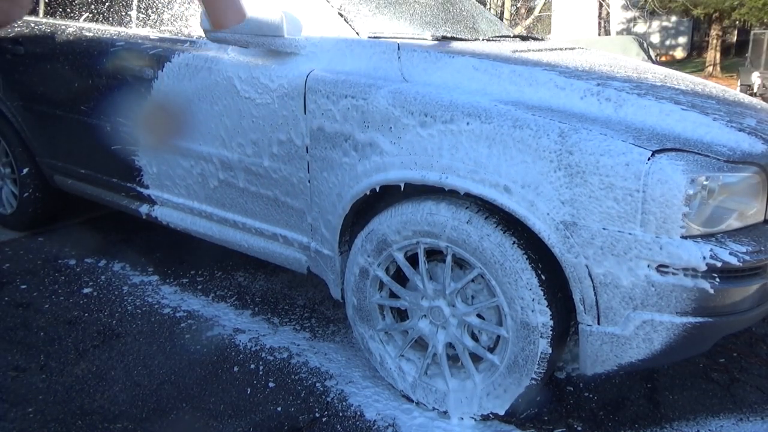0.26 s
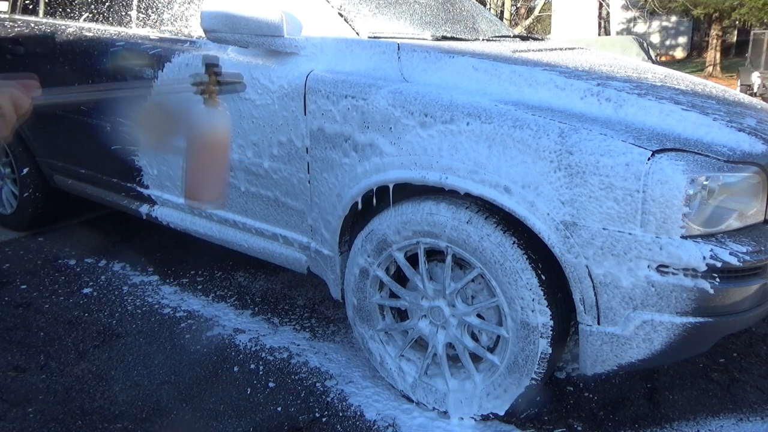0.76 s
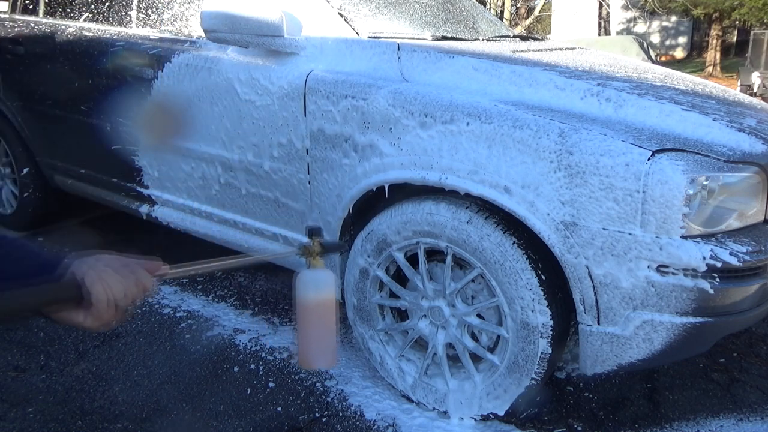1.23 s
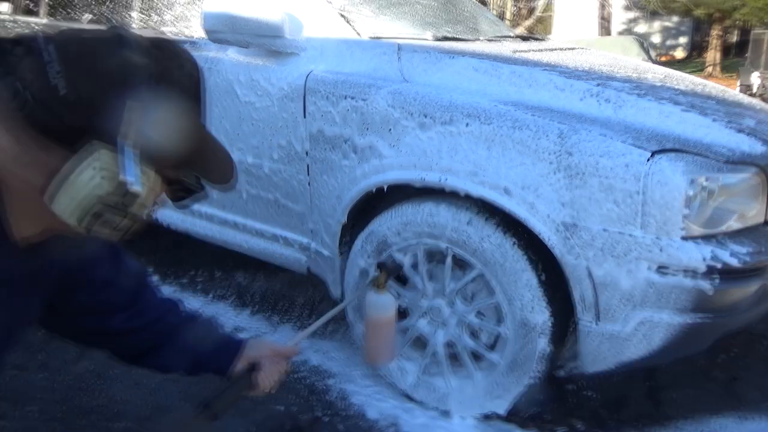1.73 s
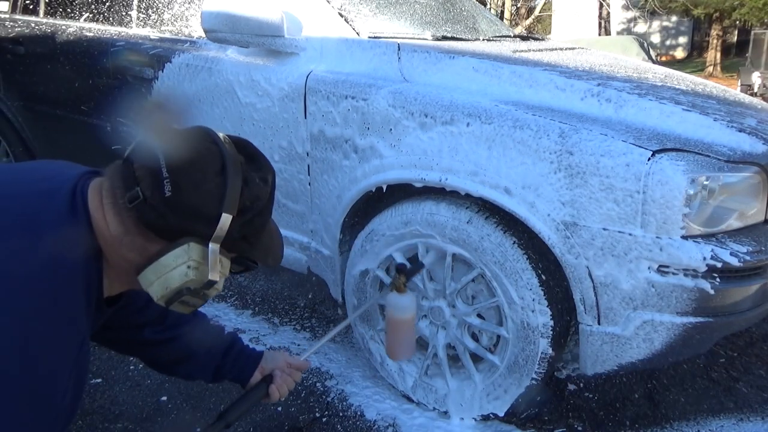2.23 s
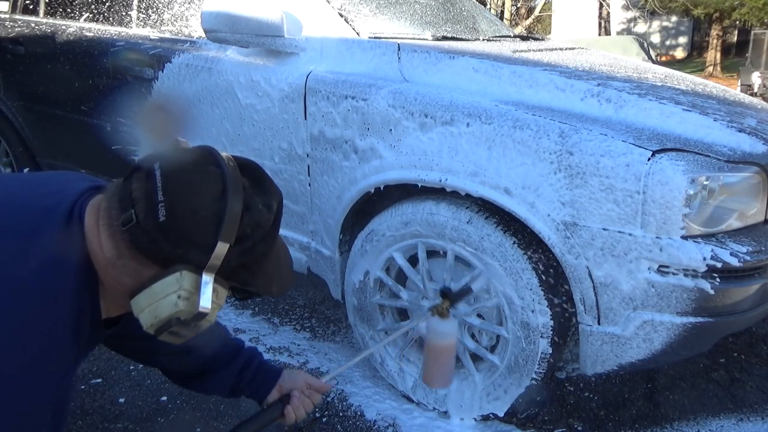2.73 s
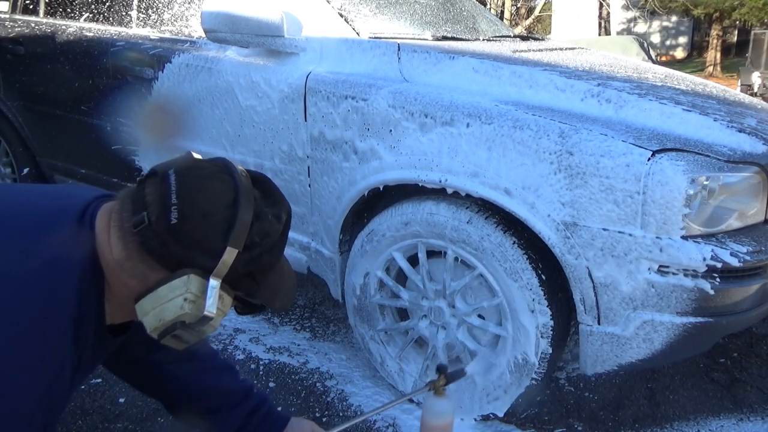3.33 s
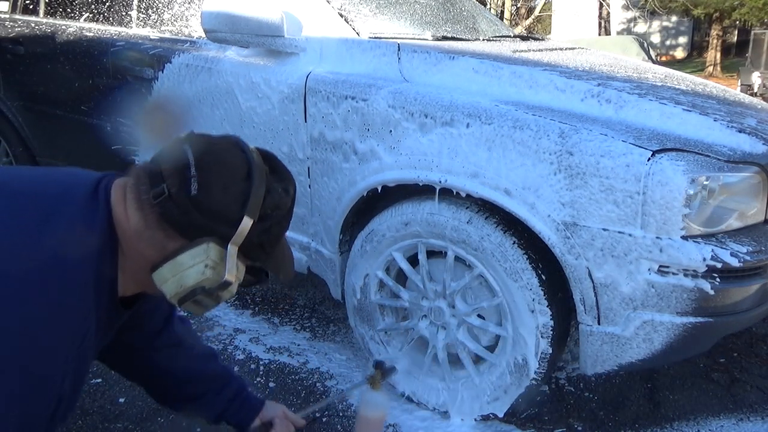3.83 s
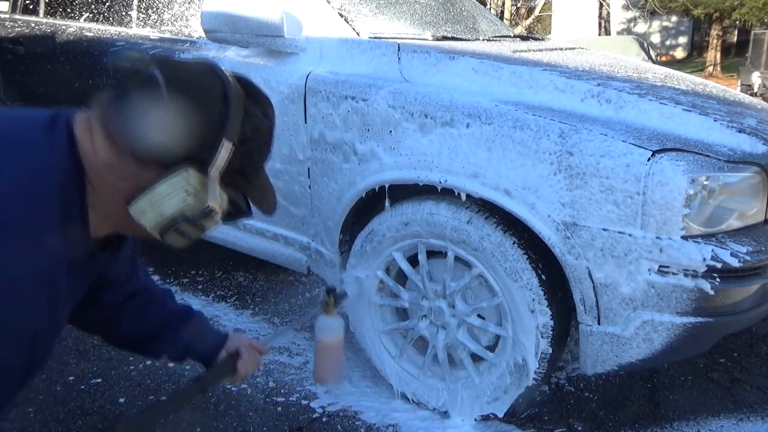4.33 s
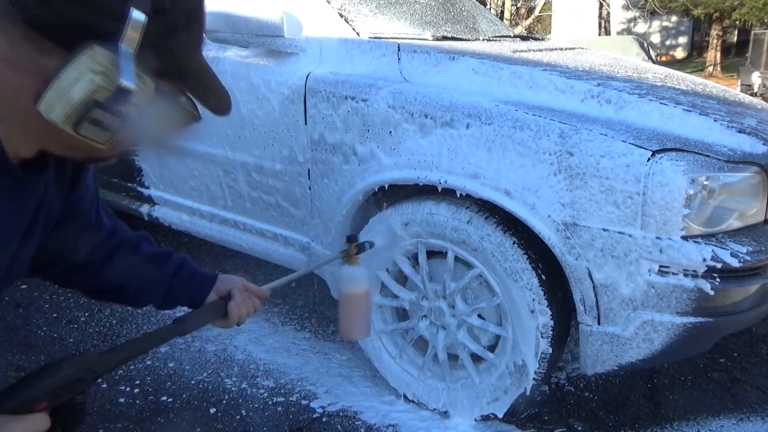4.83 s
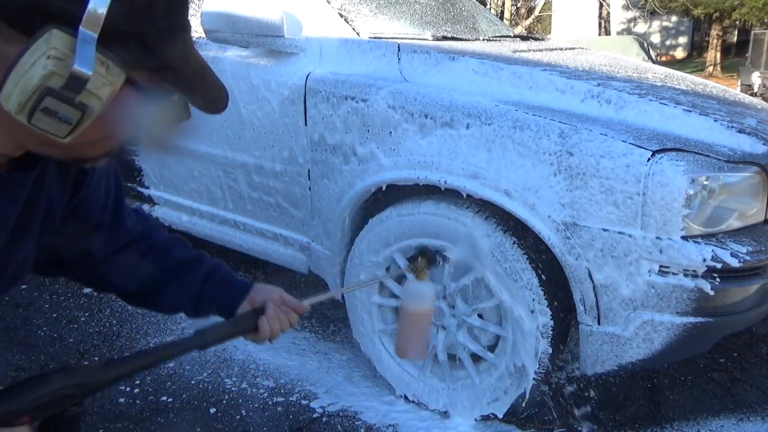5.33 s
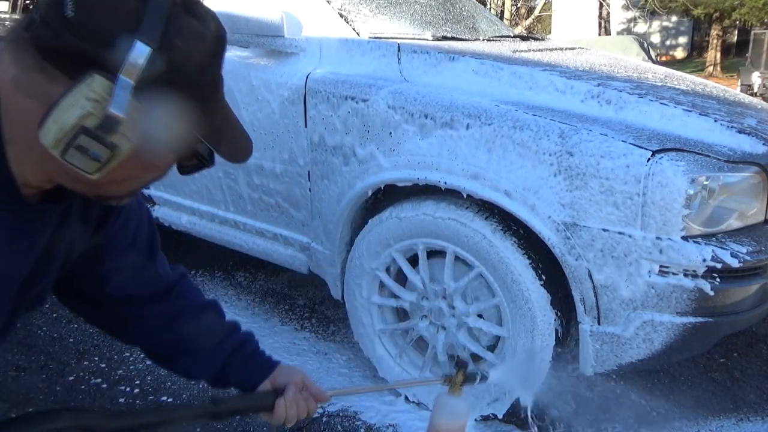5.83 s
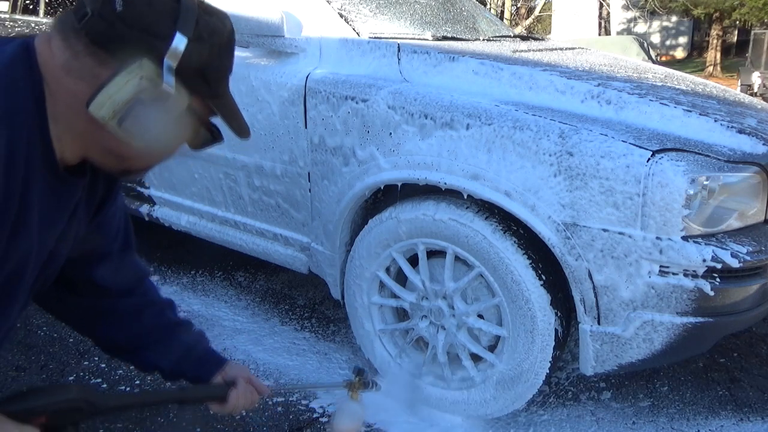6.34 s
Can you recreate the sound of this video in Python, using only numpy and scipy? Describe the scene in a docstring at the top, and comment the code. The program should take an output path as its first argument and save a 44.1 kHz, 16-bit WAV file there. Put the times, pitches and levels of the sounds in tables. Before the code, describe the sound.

A petrol pressure washer engine chugs, then drops slightly and whines as a foam cannon hisses brightly, spattering a car wheel.

```python
"""The foam jet of a petrol pressure washer hisses brightly close by as it covers a car on a driveway.
At first the gun is shut: the four-stroke engine runs free, its governor hunting, and water hisses
round the pump's bypass. The trigger is pulled; the pump loads the engine, slows it a little and whines.
The turbulent jet breaks into drops, which spatter on the wheel, and the wheel's hollows resonate."""
import sys
import numpy as np
from scipy import signal
from scipy.fft import rfft, irfft
from scipy.io import wavfile

SR = 44100
rng = np.random.default_rng(int(sys.argv[2]) if len(sys.argv) > 2 else 0)


def dump(signal):
    """Clip the signal to [-1, 1] and save it as 16-bit WAV at the path in sys.argv[1]."""
    limited = np.clip(np.atleast_2d(signal).T, -1, 1)
    pcm = np.round(limited * 32767).astype(np.int16)
    wavfile.write(sys.argv[1], SR, pcm)


N = 290178
TIME = np.arange(N) / SR
BINS_HZ = np.maximum(np.arange(N // 2 + 1) * SR / N, 1)

TRIGGER_S = 1.833
FREE_HZ, HUNT_HZ = 30.85, 1.5  # four-stroke cycle rate without load, and its swing
HUNT_PERIOD_S, HUNT_PEAK_S, SETTLE_S = .487, .39, 1.0
WHINE_ORDER, WHINE_START_S, WHINE_RISE_S = 18, 1.846, .09

# spectrum of the bypass hiss: (frequency [Hz], relative density [dB])
BYPASS_SPECTRUM = [(3000, -33), (6000, -3), (7500, -8), (9500, -3), (11500, -1), (13200, -1), (14500, -4.5),
                   (16000, -12)]
# whistles of the bypass: (frequency [Hz], bandwidth [Hz], relative level [dB])
BYPASS_WHISTLES = [(9900, 260, -8.5), (10500, 280, -11.5)]

# exhaust harmonics, free and under load: (order [multiple of the cycle rate], relative level [dB])
FREE_ORDERS = [(1, -38), (2, -27), (3, -23), (4, -7), (5, -7), (6, -17), (7, -9), (8, -3), (9, -7),
               (10, -14), (11, -10), (12, 0), (13, -12), (14, -8), (15, -16), (16, -8), (17, -13), (18, -8),
               (19, -16), (20, -11), (21, -15), (22, -15), (23, -14), (24, -10), (25, -15), (26, -8),
               (27, -13), (28, -8), (29, -11), (30, -12), (31, -15), (32, -8), (33, -15), (34, -7),
               (35, -15), (36, -10), (37, -13), (38, -4), (39, -9), (40, -6), (41, -8), (42, -4)]
LOADED_ORDERS = [(1, -38), (2, -28), (3, -34), (4, -15), (5, -11), (6, -17), (7, -15), (8, -11), (9, -6),
                 (10, -13), (11, -14), (12, -3), (13, -20), (14, -7), (15, -8), (16, -9), (17, -11),
                 (18, 0), (19, -13), (20, -10), (21, -6), (22, -7), (23, -14), (24, -8), (25, -12),
                 (26, -10), (27, -9), (28, -13), (29, -9), (30, -6), (31, -11), (32, -13), (33, -14),
                 (34, -10), (35, -14), (36, -14), (37, -14), (38, -9), (39, -16), (40, -8), (41, -11),
                 (42, -10), (43, -9), (44, -7), (45, -9), (46, -12), (47, -11), (48, -6)]
# spectra of the clatter and of a weak firing's chuff: (frequency [Hz], relative density [dB])
FREE_CLATTER_SPECTRUM = [(30, -46), (80, -20), (130, -18), (350, -5.5), (650, -7), (1000, -7.5), (1300, -4),
                         (1600, -4.5), (2200, -6.5), (3000, -9.5), (4800, -11), (6000, -16), (8000, -34),
                         (16000, -30)]
LOADED_CLATTER_SPECTRUM = [(30, -50), (80, -42), (140, -21), (280, -5.5), (550, -14.5), (830, -2),
                           (1050, -2), (1300, 1), (1700, 2), (2600, -1), (4000, -36), (8000, -72),
                           (16000, -45)]
CHUFF_SPECTRUM = [(30, -26), (50, -21), (75, 4), (130, -8), (250, -3), (550, 1), (900, -5), (2000, -8)]
# stereo balance of the engine: (frequency [Hz], left minus right [dB])
FREE_BALANCE = [(60, 5), (130, -5), (290, 3), (640, 6.5), (1410, 5.5), (3100, 4.5), (6820, -0.5),
                (15000, 1)]
LOADED_BALANCE = [(60, -3), (200, 0.5), (380, 1.5), (700, 3), (1300, 4), (4000, -3)]
# brief changes in the engine's level: (time [s], duration [s], gain [dB])
HARD_FIRINGS = [(.08, 0.087, 2), (.335, 0.024, 2), (.79, 0.016, 1)]
CLATTER_SWELLS = [(1.35, 0.29, 0.5), (1.75, .15, 0)]
LOADED_DIPS = [(1.87, 0.045, -0.5), (2.125, 0.18, -6), (2.5, 0.036, -11)]
# the speed sags under load and the governor catches it: (time [s], cycle rate [Hz])
LOADED_SPEED = [(1.89, 30.85), (1.96, 28.7), (2.03, 27.4), (2.27, 29.3), (2.51, 28.8), (2.77, 29.0),
                (3.76, 29.0), (4.36, 29.2), (5.52, 29.1), (5.83, 29.25), (6.58, 29.15)]
# envelopes of the loaded engine: (time [s], exhaust level [dB], clatter level [dB], whine level [dB])
LOADED_LEVELS = [(2.0, -32.5, -33, -34), (2.6, -33, -30.5, -34), (3.3, -33.5, -33, -36),
                 (3.68, -30.5, -31, -33.5), (4.05, -34, -33.5, -37.5), (5.55, -33, -34.5, -38.5),
                 (5.85, -32.5, -33.5, -42), (6.25, -32, -33.5, -39)]

# spectra of valve, foam impacts, mist and jet: (frequency [Hz], relative density [dB])
VALVE_SPECTRUM = [(300, -25), (1400, 9.5), (2300, -3.5), (5000, -13), (9000, -20)]
SPATTER_SPECTRUM = [(400, -68.5), (1500, -2), (2800, -1.5), (3800, 1.5), (4900, -2), (5700, 2.5),
                    (6500, -2.5), (8000, 3), (14000, -56)]
MIST_SPECTRUM = [(9000, -31), (12500, -8), (14000, 2), (15000, 2)]
JET_SPECTRUM = [(2500, -26.5), (5000, -12.5), (7000, -11), (8500, -4.5), (10000, 0), (11300, 2),
                (12500, 0.5), (13500, -1), (16000, -22)]
# the jet crosses gaps in the wheel, or hits spokes: (time [s], duration [s], relative level [dB])
HOLLOW_PASSES = [(2.41, .16, -38.5), (2.64, .2, -36.5), (2.92, .14, -37.5), (3.22, .09, -33),
                 (3.58, .28, -34), (3.82, .08, -37), (4.06, .16, -35), (4.24, 0.13, -38), (4.5, .1, -36.5),
                 (4.72, .14, -38.5), (5.2, .16, -39), (5.54, 0.17, -34), (5.68, .08, -39.5),
                 (6.0, .1, -35.5), (6.28, .16, -36.5), (6.5, .14, -37)]
SPOKE_HITS = [(2.14, 0.19, -33), (2.47, .07, -33), (2.87, 0.37, -29), (3.42, .07, -38), (3.61, 0.17, -35),
              (3.82, 0.064, -37), (4.12, 0.35, -38), (4.29, 0.063, -31.5), (5.15, 0.093, -36),
              (5.56, 0.18, -37), (6.07, 0.19, -40.5)]
# envelope of the foam landing on the wheel: (time [s], relative level [dB])
SPATTER_LEVELS = [(1.85, -33), (2.15, -31.5), (2.33, -32.5), (2.95, -30), (3.15, -32), (4.3, -33),
                  (4.4, -35), (5.6, -32.5), (5.7, -36), (6.5, -30.5)]
# envelopes as the lance moves: (time [s], relative jet level [dB], relative mist level [dB])
SPRAY_LEVELS = [(1.87, -18.5, -25), (2.12, -17.5, -30), (2.17, -18, -28), (2.95, -19.5, -29),
                (3.11, -19.5, -23), (3.72, -19.5, -31), (3.74, -18, -26), (4.09, -19, -25),
                (4.91, -18, -27.5), (6.13, -20.5, -25), (6.53, -19, -24), (6.56, -19, -24.5)]
# stereo balance as the lance sweeps past the wheel: (time [s], left minus right [dB])
SWEEP_BALANCE = [(1.85, 0), (2.75, 0), (3.25, -.4), (3.7, 0), (5.35, 0), (5.85, -1.3), (6.4, 0)]
# the spray carries little bass: (frequency [Hz], gain [dB])
SPRAY_BASS_CUT = [(60, -12), (200, -0.5)]

# likeness of left and right for each source: (frequency [Hz], correlation [0 to 1])
BYPASS_COHERENCE = [(4000, 0.49), (8000, 0.69), (15000, 1)]
ENGINE_COHERENCE = [(60, 1), (200, 1), (600, 0.87), (1300, 0.92), (3000, 0.88), (8000, 0.76)]
SPRAY_COHERENCE = [(1000, .95), (4000, .994), (7000, .995), (16000, .995)]


def from_db(db):
    """Amplitude ratio of a level in decibels."""
    return 10 ** (np.asarray(db) / 20)


def rms_one(x):
    """Normalisation to unit rms."""
    return x / np.sqrt(np.mean(x ** 2) + 1e-20)


def in_time(rows):
    """Linear interpolation of each column at every sample."""
    times, *columns = np.transpose(rows)
    return [np.interp(TIME, times, column) for column in columns]


def at_bins(points):
    """Interpolation on a log-frequency axis at every spectral bin."""
    hz, values = np.transpose(points)
    return np.interp(np.log(BINS_HZ), np.log(hz), values)


def colour(x, db):
    """Zero-phase filtering by a gain in dB at each frequency."""
    return irfft(rfft(x) * from_db(db), N)


def drift(rate):
    """Random modulation: low-pass noise of unit rms, changing about rate times a second."""
    pole = np.exp(-80 * np.pi * rate / SR)
    slow = signal.lfilter([1], [1, -2 * pole, pole * pole], rng.standard_normal(N // 40 + 2002))[2000:]
    return np.interp(np.arange(N) / 40, np.arange(len(slow)), rms_one(slow))


def window(centre_s, length_s):
    """Super-Gaussian window: smooth, flat-topped, of height 1."""
    return np.exp(-(2 * (TIME - centre_s) / length_s) ** 4)


def bumps_db(rows):
    """Brief level changes, which add in decibels."""
    return sum(db * window(s, length_s) for s, length_s, db in rows)


def passes(rows):
    """Amplitude envelope of a sound gated by separate events."""
    return sum(from_db(db) * window(s, length_s) for s, length_s, db in rows)


def spread(direct, spectrum, coherence):
    """Partial coherence: direct sound plus scattered sound that differs left and right; unit rms."""
    alike = np.clip(at_bins(coherence), 0, .999)
    mid = rfft(rms_one(direct)) * np.sqrt(1 + alike)
    side = rfft(rng.standard_normal(N)) * np.sqrt(1 - alike)
    return rms_one(irfft(np.array([mid + side, mid - side]) * from_db(at_bins(spectrum)), N))


def place(x, balance):
    """Localisation by a left-right level difference at each frequency."""
    return colour(x, at_bins(balance) * np.array([[.5], [-.5]]))


def resonance(hz, width_hz):
    """Narrow-band noise, like that of a resonator driven by turbulence; its centre may move; unit rms."""
    lowpass = signal.butter(2, width_hz / 2, fs=SR, output="sos")
    real, imaginary = signal.sosfilt(lowpass, rng.standard_normal((2, N)))
    phase = 2 * np.pi * np.cumsum(hz * np.ones(N)) / SR
    return rms_one(real * np.cos(phase) + imaginary * np.sin(phase))


def droplets(per_s, size_db, share):
    """Shot noise from single drops carries a share of the power; the smooth rush of air has the rest."""
    sizes = from_db(size_db * np.minimum(rng.exponential(1, N), 4)) * rng.choice([-1, 1], N)
    clicks = rms_one(sizes * (rng.random(N) < per_s / SR))
    return np.sqrt(share) * clicks + np.sqrt(1 - share) * rng.standard_normal(N)


def throb(cycle, firing_db, stroke_db):
    """Amplitude modulation at the firing rate and at the crank rate, which is twice as fast."""
    return from_db(firing_db * np.cos(2 * np.pi * cycle) + stroke_db * np.cos(4 * np.pi * cycle))


def hunting(lag_s=0):
    """Damped oscillation of the governor: its envelope (1 to 0) and its swing (-1 to 1)."""
    unsettled = np.exp(-(TIME / SETTLE_S) ** 2)
    return unsettled, unsettled * np.cos(2 * np.pi * (TIME - HUNT_PEAK_S - lag_s) / HUNT_PERIOD_S)


def free_level(settled_db, hunting_db, swing_db):
    """Without load, amplitude follows engine speed and is lower until the governor settles."""
    unsettled, swing = hunting()
    return from_db(settled_db + hunting_db * unsettled + swing_db * swing + bumps_db(HARD_FIRINGS))


def bypass_hiss(cycle):
    """Flow noise: with the gun shut, water spurts round the pump's bypass and whistles faintly."""
    hiss = spread(droplets(per_s=2500, size_db=5, share=0.4), BYPASS_SPECTRUM, BYPASS_COHERENCE)
    whistles = sum(from_db(db) * resonance(hz * (1 + 0.0045 * drift(2.9)), width_hz)
                   for hz, width_hz, db in BYPASS_WHISTLES)
    level = free_level(settled_db=-26, hunting_db=-5, swing_db=0.4)
    spurts = from_db(1.5 * drift(14) + 0.34 * drift(70))
    return level * spurts * throb(cycle, firing_db=0.06, stroke_db=0.3) * (hiss + whistles)


def exhaust(cycle, orders, smear, waver_db, rough):
    """One puff a cycle forms a harmonic series, whose phases the muffler disperses."""
    # each firing has its own strength and comes a little early or late
    firings = np.arange(int(cycle[-1]) + 2)
    strength, late = [np.interp(cycle, firings, d) for d in rng.standard_normal((2, len(firings)))]
    phase = 2 * np.pi * (cycle + 0.028 * rough * late)
    note = np.zeros(N)
    for order, db in orders:
        # low orders keep together as a thump, high ones scatter into a whir
        lag = (0.87 + order * smear) * rng.standard_normal()
        note += from_db(db + waver_db * drift(2.0)) * np.cos(order * phase + lag)
    return rms_one(note * from_db(5.6 * rough * strength))


def clatter(cycle, spectrum, repeat):
    """Impact noise: valves, piston and pump knock at the same angles each cycle, amid random noise."""
    angles = rng.random(60)
    knocks = np.zeros(N)
    for angle, force in zip(angles, rng.standard_normal(len(angles))):
        hits = np.flatnonzero(np.diff(np.floor(cycle - angle)))
        knocks[hits] += force * (1 + 0.11 * rng.standard_normal(len(hits)))
    # hard little contacts carry no bass
    knocks = signal.sosfilt(signal.butter(2, 700, "high", fs=SR, output="sos"), knocks)
    mix = np.sqrt(repeat) * rms_one(knocks) + np.sqrt(1 - repeat) * rng.standard_normal(N)
    return spread(mix * throb(cycle, firing_db=1.0, stroke_db=-0.7), spectrum, ENGINE_COHERENCE)


def loaded_engine(cycle, speed):
    """Load makes the firing rough until the speed is caught; the pump pistons whine at one harmonic."""
    exhaust_db, clatter_db, whine_db = in_time(LOADED_LEVELS)
    labouring = np.clip(0.38 * np.abs(speed - np.median(speed)), 0, 1)
    orders = [(order, db) for order, db in LOADED_ORDERS if order != WHINE_ORDER]
    puff_gain = from_db(exhaust_db + .5 * drift(7.2) - 2 * labouring)
    puffs = puff_gain * exhaust(cycle, orders, smear=0.088, waver_db=1.74, rough=labouring + 0.095)
    rattle = from_db(clatter_db + .5 * drift(13)) * clatter(cycle, LOADED_CLATTER_SPECTRUM, repeat=0.21)
    waver_db = (1.6 + 3 * labouring) * drift(29) - 3 * labouring
    pressure = np.clip((TIME - WHINE_START_S) / WHINE_RISE_S, 0, 1)
    whine = pressure * from_db(whine_db + waver_db) * np.cos(2 * np.pi * WHINE_ORDER * cycle)
    return place((puffs + rattle + whine) * from_db(bumps_db(LOADED_DIPS)), LOADED_BALANCE)


def free_engine(cycle):
    """Uneven combustion makes the free engine chug, off to the left; its shroud rings near 1.3 kHz."""
    unsettled, closing = hunting(lag_s=.11)  # the throttle lags the speed
    uneven = np.clip(0.38 * unsettled + 0.37 * closing, 0, 1)
    note = exhaust(cycle, FREE_ORDERS, smear=0.081, waver_db=1.5, rough=1.16 * uneven)
    puffs = free_level(settled_db=-22.5, hunting_db=-5.0, swing_db=1.2) * note
    # weak firings lose their note and chuff instead
    pulsed_noise = rng.standard_normal(N) * throb(cycle, firing_db=2, stroke_db=3.0)
    chuff = spread(pulsed_noise, CHUFF_SPECTRUM, ENGINE_COHERENCE)
    puffs = puffs * from_db(-5 * uneven) + from_db(-22.5) * uneven * chuff
    rattle = clatter(cycle, FREE_CLATTER_SPECTRUM, repeat=0.17)
    rattle *= free_level(settled_db=-23.5, hunting_db=-3, swing_db=0.6)
    shroud = free_level(settled_db=-32.5, hunting_db=-4.5, swing_db=4) * resonance(1310, width_hz=370)
    # a lower band swells and fades
    low_band = free_level(settled_db=-41.5, hunting_db=-2.5, swing_db=7) * resonance(825, width_hz=126)
    swell = from_db(bumps_db(CLATTER_SWELLS))
    bands = (shroud + swell * low_band) * throb(cycle, firing_db=-2.5, stroke_db=-7.0)
    return place(puffs + swell * rattle + bands, FREE_BALANCE)


def valve(peak_s, half_width_s, level_db):
    """Flow transient: the opening valve spits just ahead of the jet."""
    spit = spread(rng.standard_normal(N), VALVE_SPECTRUM, SPRAY_COHERENCE)
    return from_db(level_db) * spit * np.exp(-((TIME - peak_s) / half_width_s) ** 2)


def panel_reflection(x, lag_s, echo):
    """Comb filtering: the car's panel returns an echo whose delay wanders as the lance moves."""
    lag = lag_s * SR * np.exp(0.246 * drift(0.68))
    reflected = np.array([np.interp(np.arange(N) - lag, np.arange(N), channel) for channel in x])
    return (x + echo * reflected) / np.hypot(1, echo)


def wheel_hollow():
    """Cavity resonance: a hollow of the wheel sounds, and rises in pitch, as the jet enters it."""
    drive = passes(HOLLOW_PASSES)
    pitch_hz = 2091 + 110.3 * drive / drive.max()
    ring = resonance(pitch_hz * (1 + .02 * drift(8.03)), width_hz=206)
    return (drive + from_db(-46.0)) * ring * from_db([[1.5], [-1.5]])


def spoke_spits():
    """Foam striking the spokes gives band noise: a broad splash with a narrow gurgle above it."""
    splash = resonance(5074 * (1 + 0.07 * drift(9.2)), width_hz=1400)
    gurgle = resonance(5755 * (1 + 0.02 * drift(6.2)), width_hz=300)
    level = (passes(SPOKE_HITS) + from_db(-38)) * from_db(-2 + 1.9 * drift(14))
    return level * (splash + from_db(-4) * gurgle)


def foam_spatter():
    """Random impacts of foam on the wheel sum to a crackling shot noise."""
    spatter_db, = in_time(SPATTER_LEVELS)
    impacts = spread(droplets(per_s=2500, size_db=3.0, share=.35), SPATTER_SPECTRUM, SPRAY_COHERENCE)
    return from_db(spatter_db + 3 + 1.1 * drift(25)) * impacts


def jet_and_mist():
    """Atomisation: the jet hisses as it tears into drops, and its fine mist hisses higher still."""
    jet_db, mist_db = in_time(SPRAY_LEVELS)
    jet = spread(droplets(per_s=9900, size_db=2.5, share=0.11), JET_SPECTRUM, SPRAY_COHERENCE)
    mist_gain = from_db(mist_db + 5.5 + .6 * drift(6))
    mist = spread(droplets(per_s=10000, size_db=2.2, share=.05), MIST_SPECTRUM, SPRAY_COHERENCE)
    return from_db(jet_db + 1.5) * jet + mist_gain * mist


def foam_cannon():
    """Common modulation: the spluttering foam makes the jet and the wheel's sounds flutter together."""
    splutter = from_db(0.56 * drift(34) + .5 * drift(250))
    spray, spatter = jet_and_mist(), foam_spatter()
    hollow, spits = wheel_hollow(), spoke_spits()
    sweep_db, = in_time(SWEEP_BALANCE)
    pan = from_db(sweep_db * np.array([[.5], [-.5]]))
    rush = pan * panel_reflection(spray, lag_s=.0016, echo=0.079)
    wheel = panel_reflection(spatter, lag_s=0.00108, echo=0.33) + spits + hollow
    return colour(splutter * (rush + wheel), at_bins(SPRAY_BASS_CUT))


def scene():
    """Superposition of the sources; within 5 ms the trigger starts the jet and loads the engine."""
    trigger = np.clip((TIME - TRIGGER_S) / .005 + .5, 0, 1)
    _, swing = hunting()
    speed = (1 - trigger) * (FREE_HZ + HUNT_HZ * swing) + trigger * in_time(LOADED_SPEED)[0]
    cycle = np.cumsum(speed * (1 + .001 * drift(12))) / SR  # engine cycles elapsed
    shut = free_engine(cycle) + bypass_hiss(cycle)
    spraying = loaded_engine(cycle, speed) + foam_cannon()
    opening = valve(peak_s=1.82, half_width_s=0.007, level_db=-19)
    return (1 - trigger) * shut + trigger * spraying + opening


def record(dry):
    """Frequency response: each port of the microphone housing cuts a notch; the top falls steeply."""
    notch_hz = np.array([[6870], [6450]])  # left, right
    width_hz, depth_db, cutoff_hz = 820, -4, 15820
    notch_db = depth_db * np.exp(-(2 * (BINS_HZ - notch_hz) / width_hz) ** 2)
    top_db = -10 * np.log10(1 + (BINS_HZ / cutoff_hz) ** 400)
    return colour(dry, notch_db + top_db)


dry = scene()
out = record(dry)
dump(out)
```